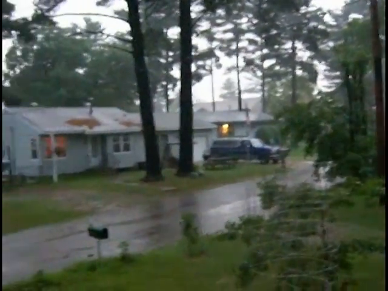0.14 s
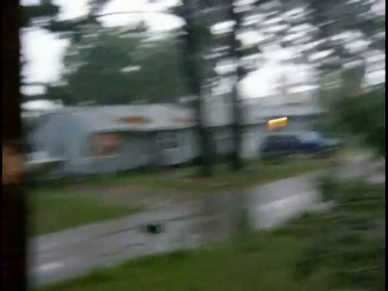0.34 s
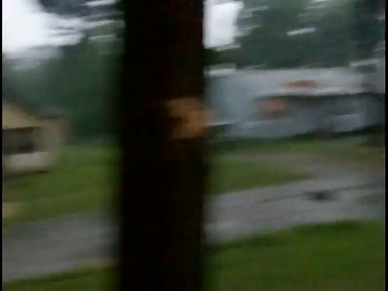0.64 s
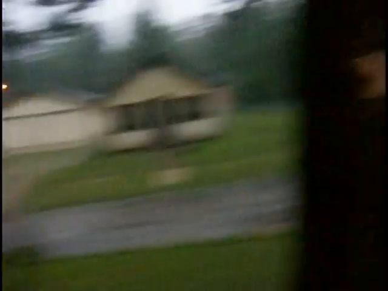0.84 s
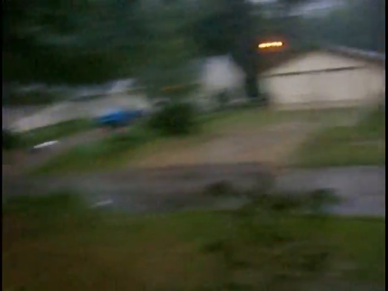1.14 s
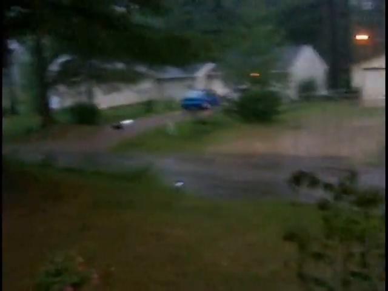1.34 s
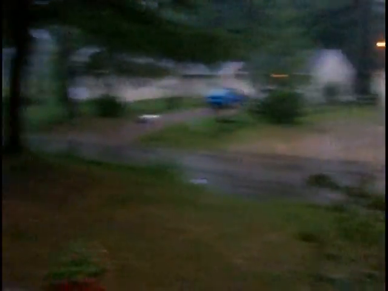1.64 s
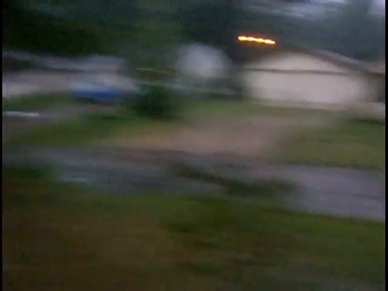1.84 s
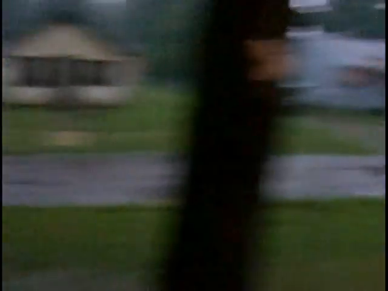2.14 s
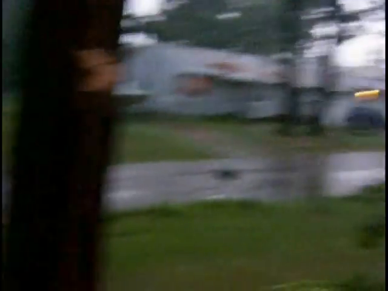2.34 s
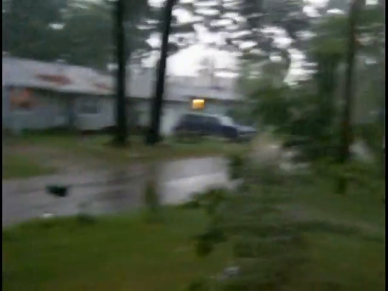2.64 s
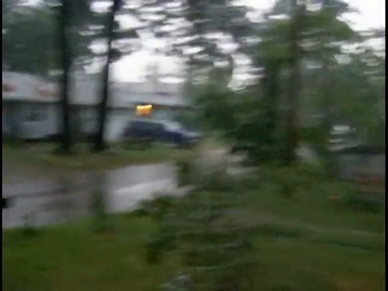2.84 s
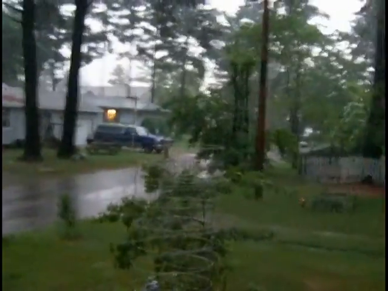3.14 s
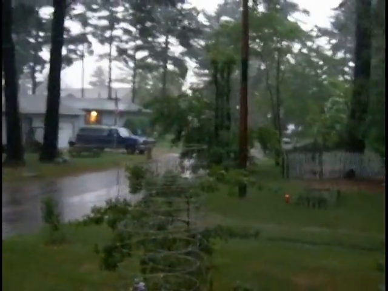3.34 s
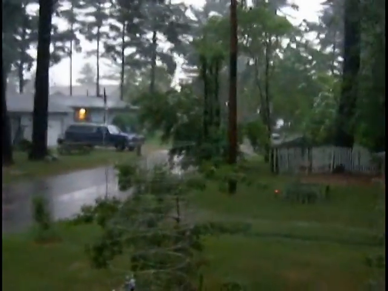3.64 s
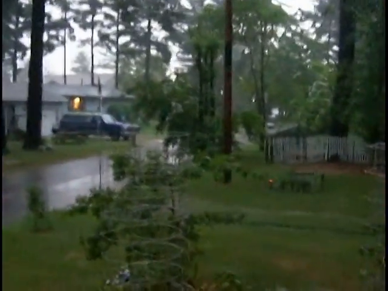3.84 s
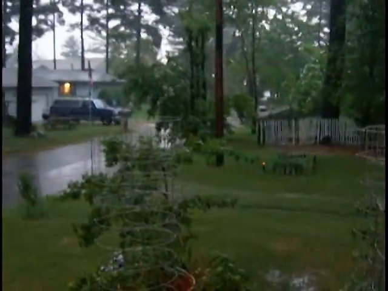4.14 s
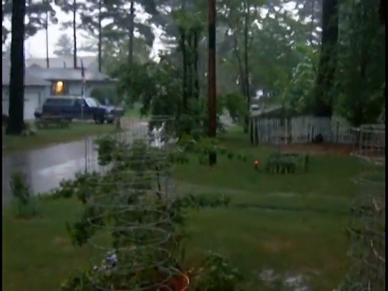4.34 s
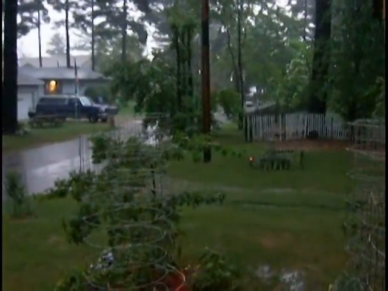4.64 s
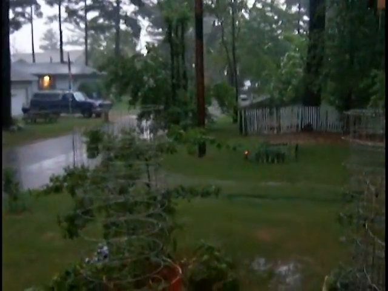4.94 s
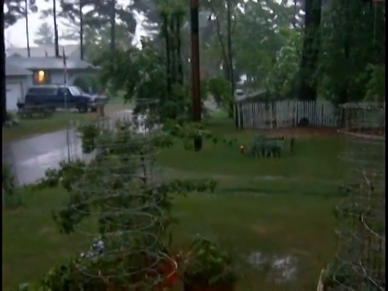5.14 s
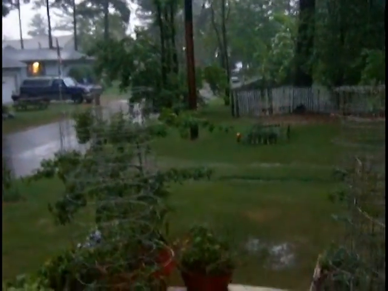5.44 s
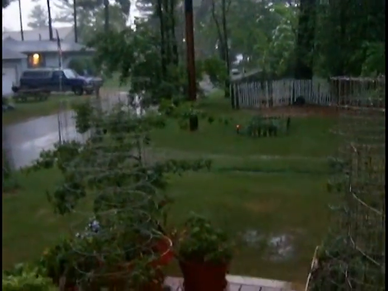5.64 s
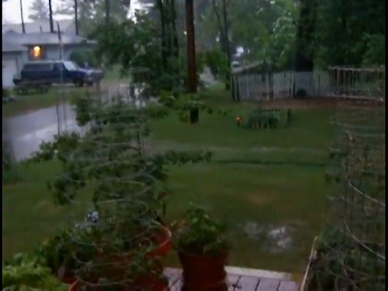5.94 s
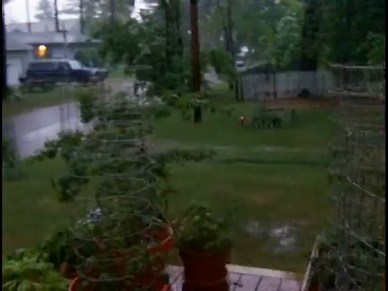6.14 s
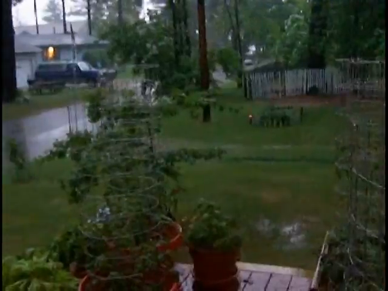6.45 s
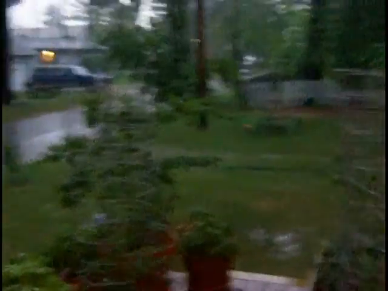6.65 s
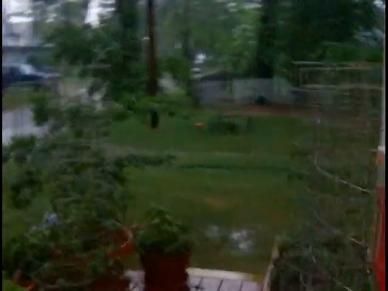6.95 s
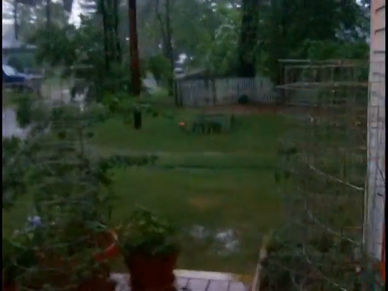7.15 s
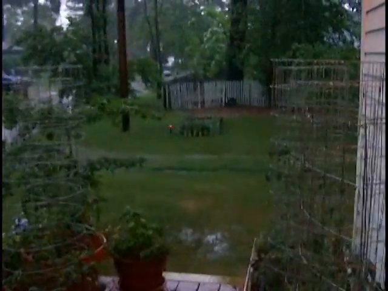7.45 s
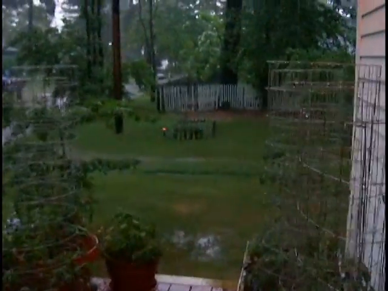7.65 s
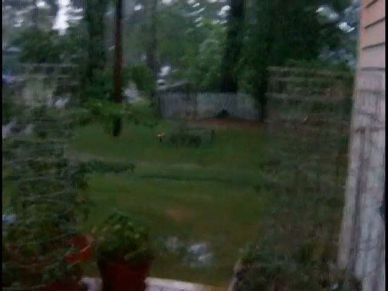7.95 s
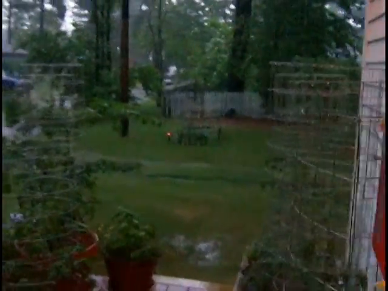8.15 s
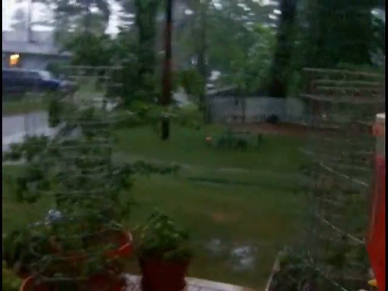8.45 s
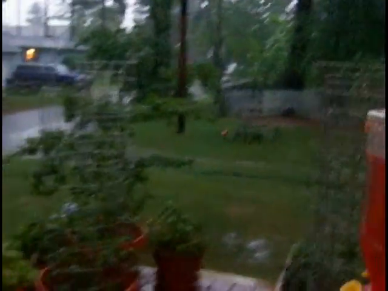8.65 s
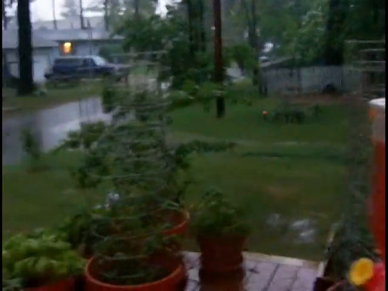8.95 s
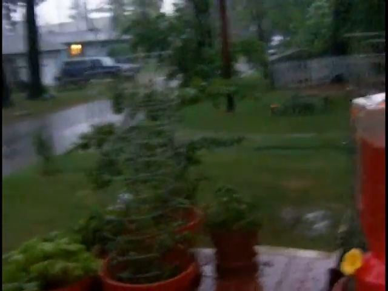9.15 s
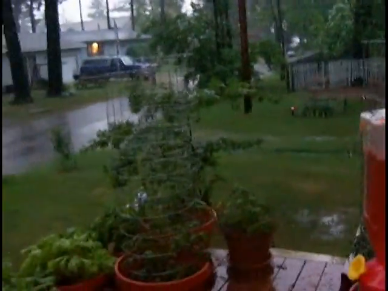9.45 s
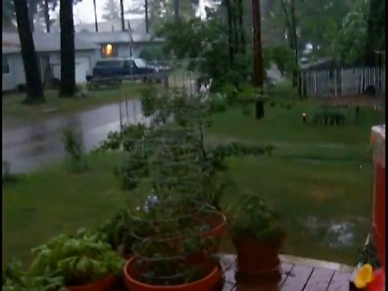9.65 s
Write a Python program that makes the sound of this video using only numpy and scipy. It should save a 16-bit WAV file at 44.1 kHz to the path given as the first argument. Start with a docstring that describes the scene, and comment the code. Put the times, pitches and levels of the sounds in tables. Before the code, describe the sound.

Outdoor storm through a slightly dull handheld microphone that clips on the loudest hits. One long, uneven thunder peal dominates, ripping at first, then booming lower and more distant. Steady rain wash, fine ticks, small plinks and a few hollow tocks sit beneath low wind buffeting. A bright snap and later a heavy knock land on the device; overall level dips suddenly several times and creeps back.

```python
"""Yard in heavy summer rain and gusty wind, heard from a porch, under a long tearing, rolling peal of thunder.
Rain, wind and thunder are filtered noise and impulse crowds; drips and taps are spray bursts plus decaying sines.
Two fat drops strike the camera, ringing its microphone rim and its shell; peaks beyond full scale clip.
The whole sound starts low and creeps up; three more times it dips abruptly and creeps back."""
import sys
import numpy as np
from scipy import signal
from scipy.fft import rfft, irfft, next_fast_len
from scipy.io import wavfile
from scipy.ndimage import uniform_filter1d, map_coordinates

SR = 44100
rng = np.random.default_rng(int(sys.argv[2]) if len(sys.argv) > 2 else 0)


def persist_wave(psi):
    """Save psi, clipped to +-1, as 16-bit WAV."""
    counts = np.round(np.clip(psi, -1, 1) * 32767).astype(np.int16)
    wavfile.write(sys.argv[1], SR, np.atleast_2d(counts).T)


N = 432621

# rain swell and ease, reference for its layers: (time [s], level [dB])
RAIN_LEVEL = [(0, -45.5), (1.6, -46.5), (2.2, -46), (2.8, -45), (3.4, -44), (5.1, -44), (6.0, -43.5),
              (7.1, -45), (7.7, -47), (8.8, -51.5), (9.81, -43)]
# spectrum of far drops merged: (frequency [Hz], relative density [dB])
WASH_SPECTRUM = [(80, -6.5), (300, 7), (900, 1), (1400, 0), (1850, 0.5), (2550, -9), (3300, -7),
                 (4700, -12.5), (6000, -14.5), (7200, -19.5), (8300, -26.5), (9400, -25.5), (10400, -40.5),
                 (12000, -74)]
# spectrum of bursting drops: (frequency [Hz], relative density [dB])
SPRAY_SPECTRUM = [(200, -36), (1000, 5), (2200, 2.5), (3500, 1), (6400, -3.5), (8000, -15), (9800, -16),
                  (11200, -40.5)]


def amp(db):
    """Decibels to gain."""
    return 10 ** (np.asarray(db) / 20)


def unit(x):
    """x at rms 1."""
    return x / np.sqrt(np.mean(x ** 2) + 1e-20)


def curves(rows):
    """One value per sample for each column after the time."""
    time_s, *columns = np.transpose(rows)
    t = np.arange(N) / SR
    return [np.interp(t, time_s, column) for column in columns]


def wobble(rate_hz):
    """Smooth random curve through rate_hz normal knots a second."""
    knots = rng.standard_normal(int(N * rate_hz / SR) + 4)
    return map_coordinates(knots, [np.arange(N) * rate_hz / SR])


def between(ends, share):
    """Value a share of the way from the first end to the second."""
    return ends[0] + (ends[1] - ends[0]) * np.clip(share, 0, 1)


def colour(x, spectrum):
    """Causal minimum-phase filter with the given (Hz, dB) response, built by folding the cepstrum."""
    m = 2 * next_fast_len(len(x) // 2 + 4096, real=True)
    hz, db = np.transpose(spectrum)
    log_hz = np.log(np.fft.rfftfreq(m, 1 / SR) + 1)
    gain = amp(np.interp(log_hz, np.log(hz), db))
    cepstrum = irfft(np.log(gain), m)
    cepstrum[1:m // 2] *= 2
    cepstrum[m // 2 + 1:] = 0
    response = np.exp(rfft(cepstrum))
    return irfft(rfft(x, m) * response, m)[:len(x)]


def impacts(rate_hz, spread_db):
    """Random pulses, rate_hz a second on average, of clipped log-normal size and either sign."""
    size = rng.standard_normal(N)
    hit = rng.random(N) < rate_hz / SR
    sign = np.sign(rng.standard_normal(N))
    return hit * sign * amp(spread_db * np.clip(size, -2.5, 2.5))


def add(track, time_s, sound):
    """Mix a sound into the track at time_s."""
    part = track[max(round(time_s * SR), 0):][:len(sound)]
    part += sound[:len(part)]


def patchy(x, depth_db):
    """Drifting random gain patches over time and frequency."""
    z = signal.stft(x, nperseg=512)[2]
    field = uniform_filter1d(rng.standard_normal(z.shape), size=7, axis=0)
    field = uniform_filter1d(field, size=14, axis=1)
    return signal.istft(z * amp(depth_db * unit(field)), nperseg=512)[1][:N]


def bursts(rate_hz, spread_db, t60_s):
    """Random noise-burst envelope: decaying powers add, then the root gives amplitude."""
    t = np.arange(SR // 10) / SR
    decay = amp(-120 * t / t60_s)  # power; amplitude falls 60 dB in t60_s
    power = signal.fftconvolve(impacts(rate_hz, spread_db) ** 2, decay)[:N]
    return np.sqrt(np.abs(power))


def ring(modes, t, swing=-1):
    """Decaying sines from (Hz, dB, t60 s) rows; neighbours start opposed (-1) or together (1)."""
    total = 0
    for k, (hz, db, t60_s) in enumerate(modes):
        total = total + swing ** k * amp(db - 60 * t / t60_s) * np.sin(2 * np.pi * hz * t)
    return total


def contact(t):
    """The force builds while a drop flattens: linear 0.4 ms rise."""
    return np.clip(t / .0004, 0, 1)


def wind():
    """Air eddies buffet the microphone: low-frequency noise in slow gusts."""
    # buffeting spectrum: (frequency [Hz], relative density [dB])
    buffet_spectrum = [(8, -18), (18, -0.5), (36, -0.5), (55, -9.5), (90, -15.5), (200, -38), (500, -89)]
    gust_db = -33.5 + 1.3 * wobble(2.0) + 2.2 * wobble(6.3)
    return amp(gust_db) * unit(colour(rng.standard_normal(N), buffet_spectrum))


def rain():
    """Far drops merge into a noise wash; nearer ones patter as pulses and burst into puffs of spray."""
    level_db, = curves(RAIN_LEVEL)
    wash = unit(colour(patchy(rng.standard_normal(N), depth_db=1.0), WASH_SPECTRUM))
    patter = unit(colour(impacts(rate_hz=1500, spread_db=5.5), WASH_SPECTRUM))
    puffs = bursts(rate_hz=70, spread_db=2.0, t60_s=0.11)
    splashes = unit(colour(puffs * rng.standard_normal(N), SPRAY_SPECTRUM))
    # harder rain throws more spray
    spray_db = -5.5 + 1.2 * (level_db - level_db.max())
    layers = amp(6) * wash + amp(2.5) * patter + amp(spray_db) * splashes
    return amp(level_db + 0.26 * wobble(7.7)) * layers


def ticks():
    """Single drops tick on porch boards and potted plants: very short noise bursts."""
    level_db, = curves(RAIN_LEVEL)
    envelope = bursts(rate_hz=15, spread_db=2.5, t60_s=.015)
    return amp(level_db + 7.5) * envelope * unit(colour(rng.standard_normal(N), SPRAY_SPECTRUM))


def drip(spray_db, hz, ring_db):
    """A drip throws filtered-noise spray and briefly rings the puddle, pot or board it lands on."""
    # ring modes: (multiple of ring pitch [-], level relative to ring [dB], t60 [s])
    plink_modes = [(1, 0.5, 0.02), (1.55, -11.5, 0.011), (2.62, -16.5, 0.015)]
    t = np.arange(SR // 10) / SR
    spray_t60_s = 0.007 * hz / 1000  # high drips spray longer
    # the smaller the drip, the higher it rings and the thinner its spray
    thin_spectrum = [(.3 * hz, -14), (.9 * hz, 0)]
    noise = colour(rng.standard_normal(len(t)), SPRAY_SPECTRUM)
    spray = unit(colour(noise, thin_spectrum)) * amp(spray_db - 60 * t / spray_t60_s)
    modes = [(hz * ratio, ring_db + db, t60_s) for ratio, db, t60_s in plink_modes]
    return (spray + ring(modes, t)) * (1 - np.exp(-t / 0.00006))


def drips():
    """Near drips into puddles and onto leaves, each a spray burst with a ring."""
    # drips: (time [s], spray level before 9 dB cut [dB], ring pitch [Hz], ring level [dB])
    drip_rows = [(2.032, -21.5, 4560, -34), (2.129, -37, 1440, -25.5), (2.399, -23.5, 3500, -42),
                 (2.447, -24.5, 5050, -43), (2.698, -23, 6000, -40), (2.775, -22, 4020, -41),
                 (3.182, -16, 4140, -38), (4.041, -24, 3500, -42), (4.810, -21, 5000, -44),
                 (5.382, -22, 2300, -31), (5.590, -23, 3800, -41), (5.632, -23.5, 4100, -34),
                 (5.665, -23.5, 4400, -41), (5.783, -22.5, 5500, -38), (5.975, -20.5, 5730, -31),
                 (6.146, -22, 4600, -43), (4.179, -15.5, 4000, -32), (6.399, -25, 2300, -36),
                 (6.488, -25, 3500, -42), (6.917, -21, 4400, -34), (7.386, -23, 4050, -36),
                 (7.603, -23, 3900, -34), (7.656, -20, 4400, -36), (7.872, -29, 3660, -38),
                 (8.226, -42, 1400, -28), (8.322, -28, 5300, -33), (9.179, -32, 4500, -45),
                 (9.387, -29, 3300, -44)]
    out = np.zeros(N)
    for time_s, spray_db, hz, ring_db in drip_rows:
        add(out, time_s, drip(spray_db - 9.0, hz, ring_db))
    return out


def taps():
    """Drops on pots, boards and wire spray for an instant and ring three resonances in a hollow tock."""
    # taps: (time [s], spray level before 7.5 dB cut [dB], ring t60 [s],
    #        low [Hz], level [dB], middle [Hz], level [dB], high [Hz], level [dB])
    tap_rows = [(.5692, -17, .019, 1780, -14, 2650, -25, 4850, -27),
                (4.188, -21, .015, 1350, -18, 1650, -24, 4700, -37),
                (4.3166, -21, .005, 1150, -14, 2600, -21, 4400, -24),
                (4.442, -16.5, .018, 1250, -25, 1780, -17, 4900, -33),
                (5.549, -27, .013, 1130, -18.5, 1600, -28, 4300, -36),
                (7.4825, -9.5, .015, 740, -21, 1180, -11, 1780, -14),
                (7.630, -27, .008, 330, -11, 900, -19, 1600, -21),
                (8.6745, -20.5, .015, 2050, -22.5, 3350, -27, 4480, -24)]
    out, t = np.zeros(N), np.arange(SR // 10) / SR
    for time_s, spray_db, t60_s, *resonances in tap_rows:
        modes = [(hz, db, t60_s) for hz, db in zip(resonances[::2], resonances[1::2])]
        noise = unit(colour(rng.standard_normal(len(t)), SPRAY_SPECTRUM))
        spray = noise * amp(spray_db - 7.5 - 60 * t / 0.013)
        add(out, time_s, contact(t) * (ring(modes, t, swing=1) + spray))
    return out


def camera_hits():
    """A small fast drop snaps on the rim, a heavy one knocks on the shell: modes, crack and a diffuse porch
    reflection."""
    # stiff rim of microphone opening: (frequency [Hz], level relative to hit [dB], t60 [s])
    rim_modes = [(1000, -15.5, .014), (1747, -14, .0104), (2360, -7, .0098), (2803, -6, .0098),
                 (4380, -3, .006), (5256, -8, .0055), (5817, -5, .0068), (6518, -10.5, .0071),
                 (7800, -14.5, .005), (9700, -12.5, .0051)]
    # camera shell: (frequency [Hz], level relative to hit [dB], t60 [s])
    shell_modes = [(660, 3, .0092), (892, -20, .052), (1094, 1.5, .013), (1340, 7.5, .011),
                   (1865, -13, .046), (2120, -11, .044), (2707, 0, .0147), (2952, -4, .013),
                   (3296, -3.5, .011), (4093, -7, .0127), (4828, .5, .006), (5908, -11.5, .0088),
                   (7434, -8, .0037)]
    out, t = np.zeros(N), np.arange(SR // 10) / SR
    # (time s, hit dB, crack dB relative to hit, modes)
    hits = [(4.9355, 1.5, -25, rim_modes), (7.1882, 0, -15, shell_modes)]
    for time_s, hit_db, crack_db, modes in hits:
        crack = unit(colour(rng.standard_normal(len(t)), SPRAY_SPECTRUM)) * amp(crack_db - 60 * t / .009)
        # the porch throws back a diffuse tail of each hit
        reflection = unit(colour(rng.standard_normal(len(t)), WASH_SPECTRUM)) * amp(-33 - 60 * t / .09)
        add(out, time_s, amp(hit_db) * contact(t) * (ring(modes, t) + crack + reflection))
    return out


def surges():
    """Surges as a channel bend arrives at once, lulls between bends: Gaussian dB lifts of rumble and roll."""
    # surges and lulls: (centre time [s], Gaussian sigma [s], rumble lift [dB], roll lift [dB])
    surge_rows = [(0.63, 0.035, 10.5, 6.5), (0.917, 0.041, -6, -1), (1.038, 0.026, 6, 7.5),
                  (1.464, 0.017, -2.5, 6.5), (2.403, 0.024, -1, 6), (2.66, 0.033, 5, 3),
                  (3.266, 0.066, 1, 8.5), (3.736, 0.089, -3.5, -1), (3.91, 0.028, 4.5, 7),
                  (4.18, 0.029, 0.5, -3.5), (4.665, 0.032, -5.5, 2), (4.85, 0.054, -5, 2.5),
                  (5.037, 0.051, 1, 2.5), (5.21, 0.077, 2.5, 0), (6.093, 0.058, 7, 0),
                  (6.38, 0.097, 8, 0.5), (6.792, 0.034, 4.5, 3), (7.14, 0.052, 9, -1.5),
                  (7.592, 0.023, 11, 5), (8.334, 0.053, 6, -1), (9.79, 0.055, 5, 5.5)]
    t = np.arange(N) / SR
    lifts_db = np.zeros((2, N))
    for time_s, sigma_s, rumble_db, roll_db in surge_rows:
        bell = np.exp(-.5 * ((t - time_s) / sigma_s) ** 2)
        lifts_db += np.outer([rumble_db, roll_db], bell)
    return lifts_db


def peal(spectrum, rate_hz, spread_db, steady_s):
    """A crowd of shocks dulled by the air, evened in strength over spans longer than steady_s."""
    shocks = unit(colour(impacts(rate_hz, spread_db), spectrum))
    power = np.abs(uniform_filter1d(shocks ** 2, int(steady_s * SR)))
    return shocks / np.sqrt(power + 0.019)


def clap():
    """A crowd of shocks swells, breaks off fast and leaves a slower echo tail."""
    # clap spectrum: (frequency [Hz], relative density [dB])
    crash_spectrum = [(150, -20), (300, -4), (420, -9), (540, 5), (720, 1), (950, -6.5), (1300, -14.5),
                      (1900, -25.5), (3000, -44.5), (6000, -96)]
    peak_s, peak_db = 1.726, -19
    rise_db_per_s, fall_db_per_s = 97, 118
    echo_db, echo_fall_db_per_s = -11, 36  # echo relative to peak
    t = np.arange(N) / SR - peak_s
    before_s, after_s = np.maximum(-t, 0), np.maximum(t, 0)
    fall_db = np.maximum(-fall_db_per_s * after_s, echo_db - echo_fall_db_per_s * after_s)
    envelope = amp(peak_db - rise_db_per_s * before_s + fall_db)
    return envelope * peal(crash_spectrum, rate_hz=1500, spread_db=5.0, steady_s=0.11)


def booms():
    """Shocks arriving together make a few heavy pressure swings: Gaussian-windowed sines, random phase."""
    # booms: (centre time [s], envelope peak [dB], pitch [Hz], Gaussian sigma [s])
    boom_rows = [(1.752, -17.5, 268, 0.017), (1.879, -8.5, 80.5, 0.023), (2.835, -8, 143.4, 0.018),
                 (2.855, -8, 87.5, 0.027), (4.175, -8, 63.5, 0.037), (5.131, -13, 87.7, 0.045),
                 (5.288, -16, 89, 0.045), (5.868, -13.5, 68, 0.03), (6.101, -16, 61, 0.065),
                 (6.292, -8, 45, 0.015), (6.403, -5, 49.5, 0.024), (7.145, -13.5, 51, 0.018)]
    out, t = np.zeros(N), np.arange(-SR // 10, SR // 10) / SR
    for time_s, db, hz, sigma_s in boom_rows:
        swing = np.sin(2 * np.pi * (hz * t + rng.random()))
        add(out, time_s + t[0], amp(db) * np.exp(-.5 * (t / sigma_s) ** 2) * swing)
    return out


def thunder():
    """Shocks from along the lightning channel arrive in a crowd; the farther they come, the duller."""
    # peal: (time [s], strength [dB], share from far end of channel [0-1])
    peal_rows = [(0, -17, 0.15), (.45, -20.5, 0.24), (.9, -20.5, 0.06), (1.35, -15.5, 0.56),
                 (1.75, -17.5, 0.2), (2.0, -22, 0.3), (2.75, -19.5, 0.31), (3.0, -12.5, 0.62),
                 (3.7, -16.5, 0.77), (4.6, -12.5, 0.87), (5.4, -16, 0.89), (6.1, -18, 0.43),
                 (6.6, -21.5, 0.74), (7.15, -24, 0.81), (8.5, -37, 0.75), (9.0, -28.5, 0.16),
                 (9.81, -29.5, 0)]
    # voice spectra: (frequency [Hz], relative density [dB]); roll before its pitch factors
    deep_spectrum = [(10, -19), (22, 4.5), (34, 10), (48, 11.5), (65, -4), (130, -51), (500, -110)]
    rumble_spectrum = [(8, -39.5), (20, -19), (35, -7.5), (55, -5.5), (70, -3), (88, -2.5), (115, -11.5),
                       (220, -36.5), (500, -94.5)]
    roll_spectrum = [(50, -27), (95, -11.5), (125, 1.5), (165, -1), (225, -7.5), (290, -8), (370, -24),
                     (700, -50.5), (1500, -102)]
    tear_spectrum = [(150, -13), (300, 0), (420, 2), (580, -2.5), (800, -7.5), (1100, -12), (1600, -22),
                     (2400, -44.5), (5000, -78)]
    t = np.arange(N) / SR
    strength_db, far = curves(peal_rows)
    far = np.clip(far, 0, 1)
    rumble_lift_db, roll_lift_db = surges()

    # voice levels against strength: (near end dB, far end dB)
    rumble_db = strength_db + between((-5.5, 0.5), far) + rumble_lift_db
    roll_db = strength_db + between((1, -9.5), far) + roll_lift_db
    # tearing follows part of the roll surges
    tear_db = strength_db + between((-4, -22), far) + 0.45 * roll_lift_db
    tear_db -= 0.98 * t  # dB per s: later shocks have crossed more air
    # deepest voice starts weak and takes over as the peal recedes
    deep_start_db, deep_growth_db_per_s, deep_full_db = -29, 3.6, -3
    deep_db = strength_db + np.minimum(deep_start_db + deep_growth_db_per_s * t, deep_full_db)

    rumble = amp(rumble_db) * peal(rumble_spectrum, rate_hz=500, spread_db=4.0, steady_s=0.18)
    near_spectrum = [(1.01 * hz, db) for hz, db in roll_spectrum]
    far_spectrum = [(0.797 * hz, db) for hz, db in roll_spectrum]
    near_roll = peal(near_spectrum, rate_hz=350, spread_db=2.5, steady_s=0.16)
    far_roll = peal(far_spectrum, rate_hz=350, spread_db=4.5, steady_s=0.11)
    roll = amp(roll_db) * (np.sqrt(1 - far) * near_roll + np.sqrt(far) * far_roll)
    tear = amp(tear_db) * peal(tear_spectrum, rate_hz=2500, spread_db=0.5, steady_s=0.25)
    deep = amp(deep_db) * peal(deep_spectrum, rate_hz=170, spread_db=5.5, steady_s=0.29)
    return deep + rumble + roll + tear + clap() + booms()


def dips():
    """Overall gain that drops in 12 ms at each dip and climbs back evenly in dB."""
    # dips: (onset time [s], depth [dB], onset to full recovery [s])
    dip_rows = [(-.03, 10.5, 1.44), (2.838, 6, 4), (6.29, 3.5, 0.75), (7.2, 10, 1.08)]
    t = np.arange(N) / SR
    loss_db = np.zeros(N)
    for onset_s, depth_db, recovery_s in dip_rows:
        loss_db += np.interp(t, [onset_s, onset_s + 0.012, onset_s + recovery_s], [0, depth_db, 0])
    return amp(-loss_db)


def scene():
    """Rain, wind, thunder and the near water, all dipping together."""
    water = rain() + ticks() + drips() + taps() + camera_hits()
    return (dips() * (wind() + water + thunder()))[None]


def record(dry):
    """Dull microphone, clipping at full scale, treble roll-off, then a steep band limit."""
    # response before clipping: (frequency [Hz], gain [dB])
    microphone_response = [(20, 0), (9000, 0), (10300, -4.5), (11500, -20), (14000, -46)]
    # response after clipping: (frequency [Hz], gain [dB])
    output_response = [(20, -0.5), (7800, 0), (10300, -5), (12000, -25), (15000, -28), (16300, -60)]
    clipped = np.clip(colour(dry[0], microphone_response), -1, 1)
    band_limit = signal.butter(24, 15800, fs=SR, output="sos")  # low-pass, Hz
    return signal.sosfilt(band_limit, colour(clipped, output_response))[None]


dry = scene()
out = record(dry)
persist_wave(out)
```